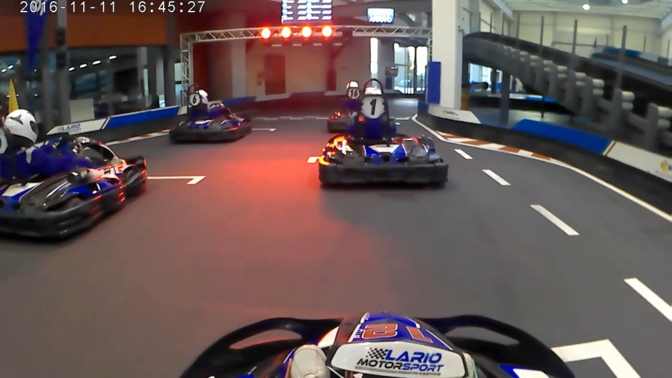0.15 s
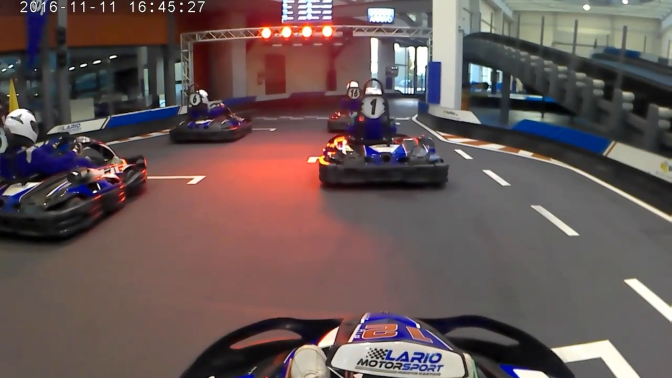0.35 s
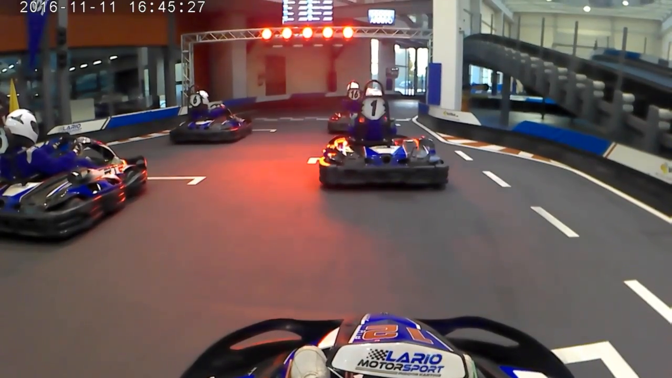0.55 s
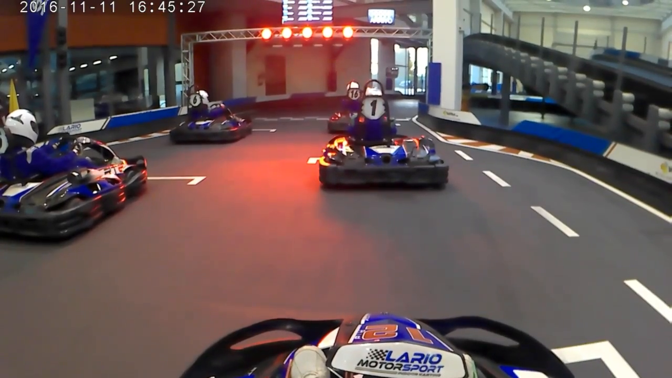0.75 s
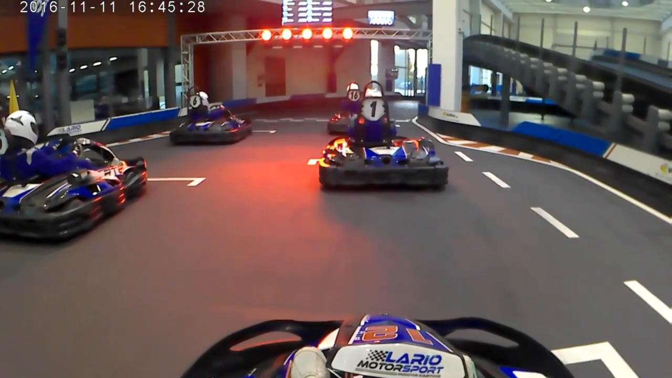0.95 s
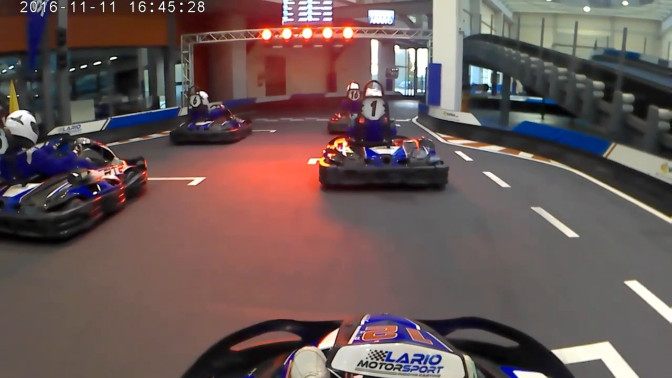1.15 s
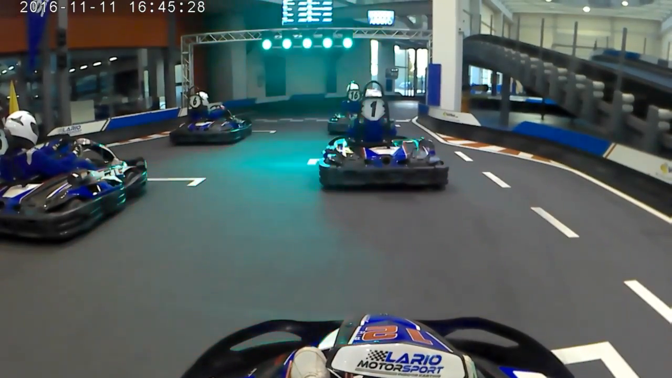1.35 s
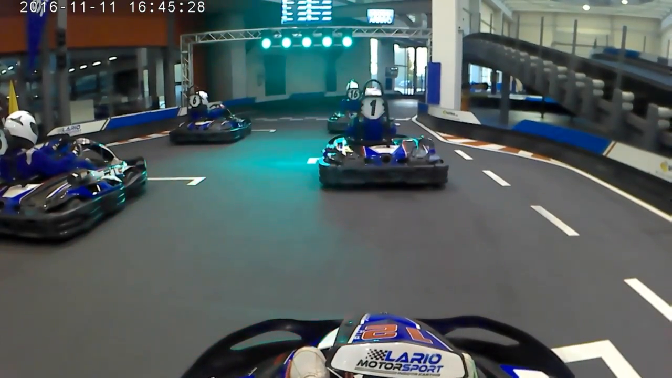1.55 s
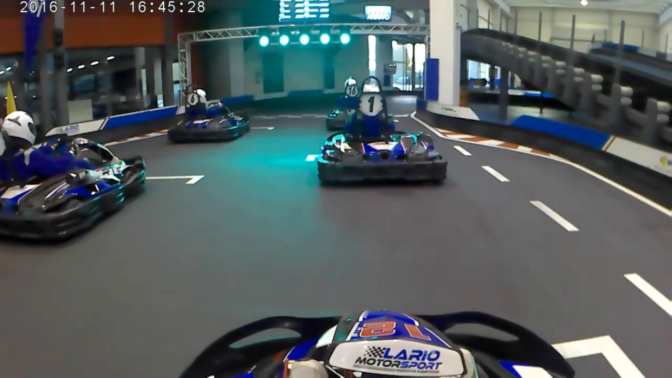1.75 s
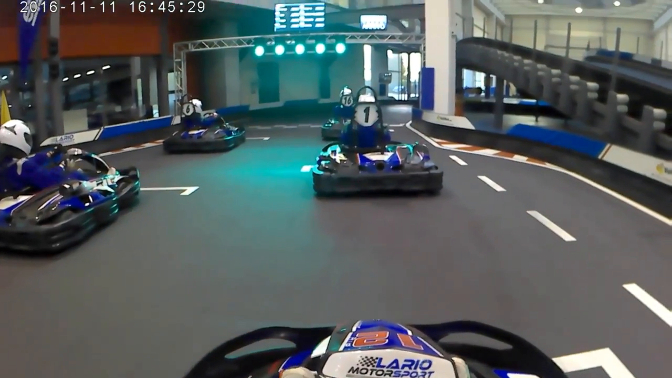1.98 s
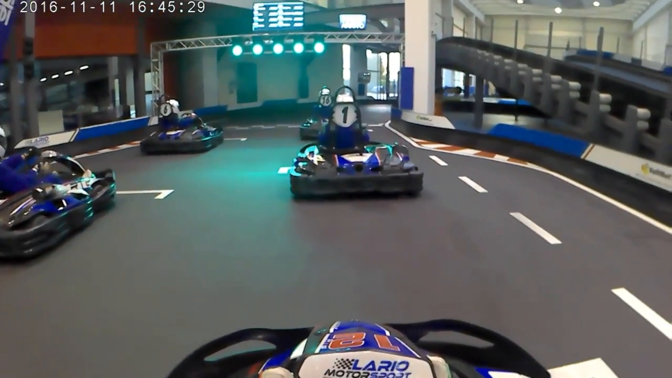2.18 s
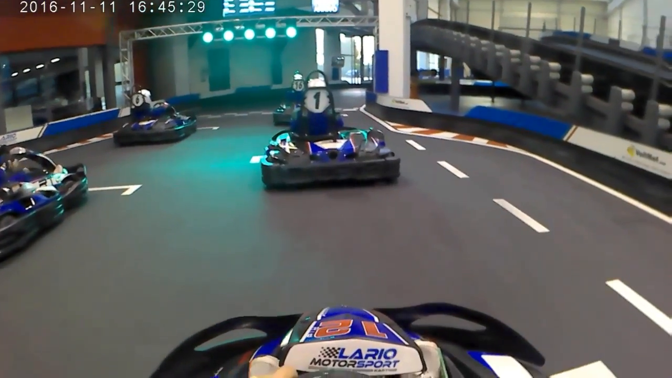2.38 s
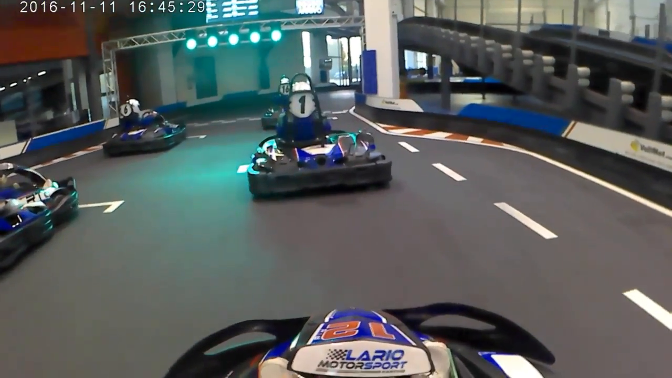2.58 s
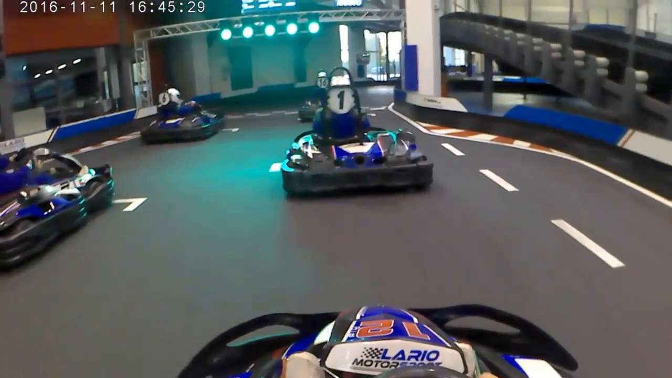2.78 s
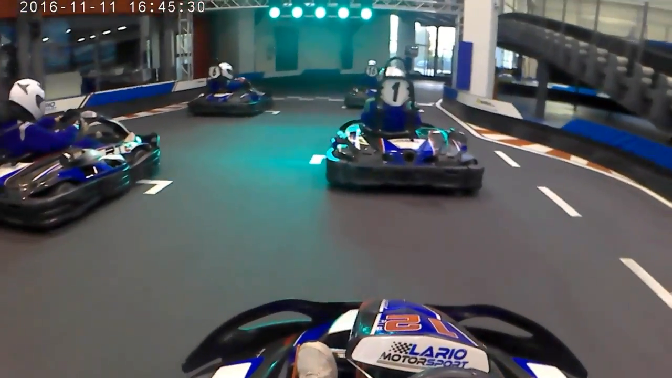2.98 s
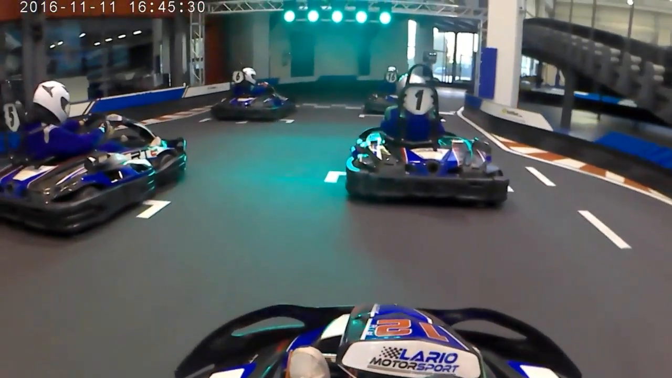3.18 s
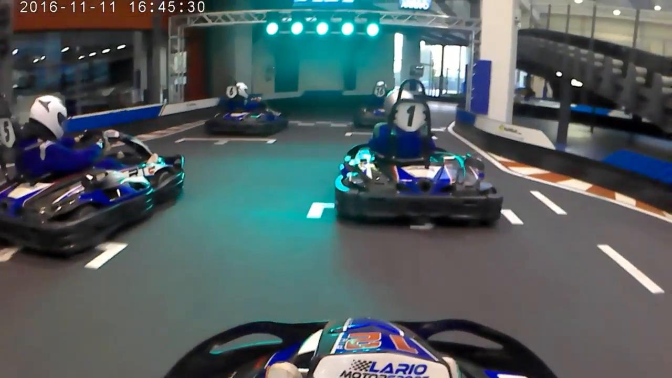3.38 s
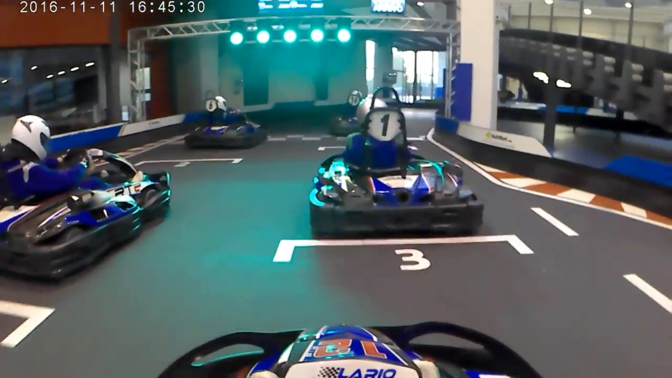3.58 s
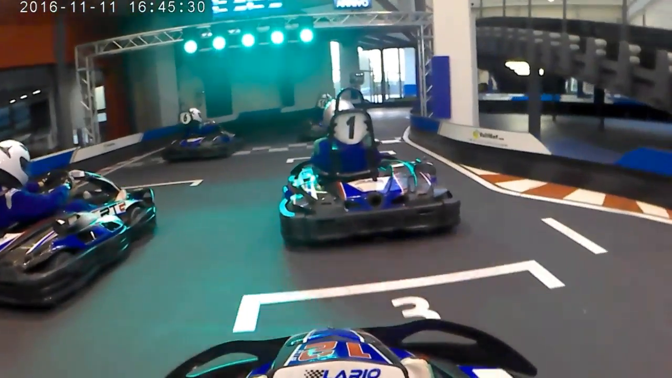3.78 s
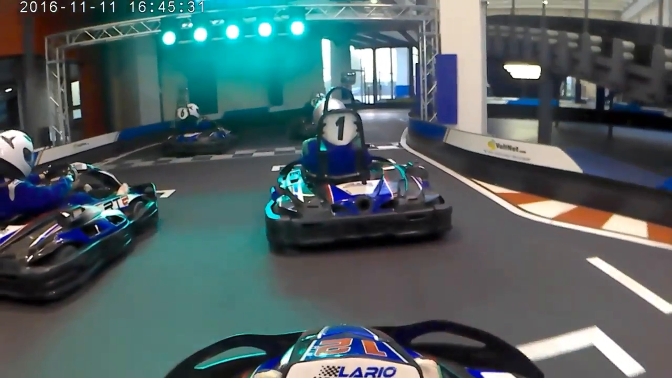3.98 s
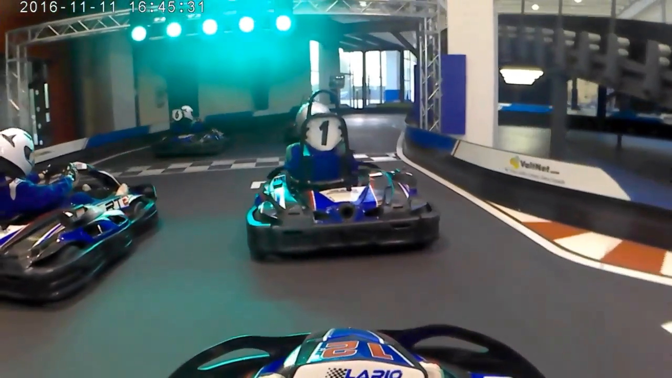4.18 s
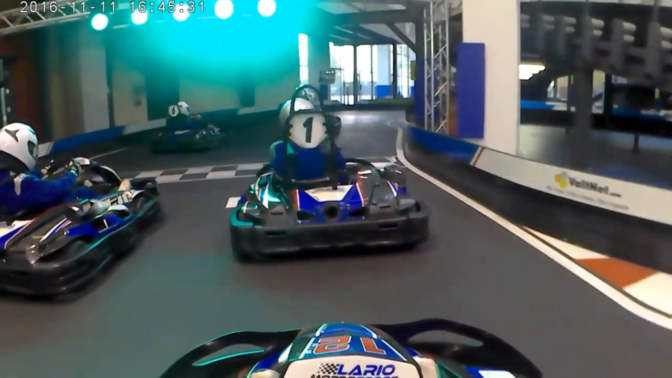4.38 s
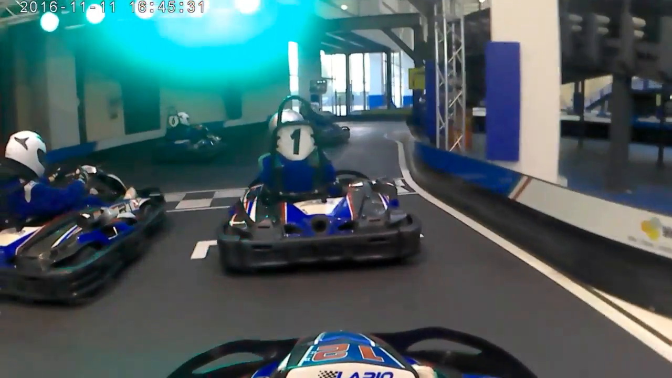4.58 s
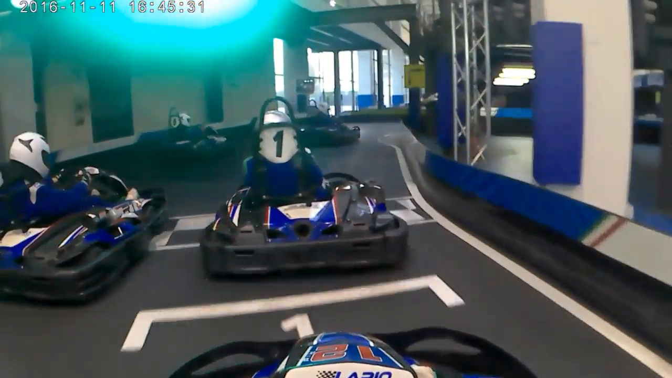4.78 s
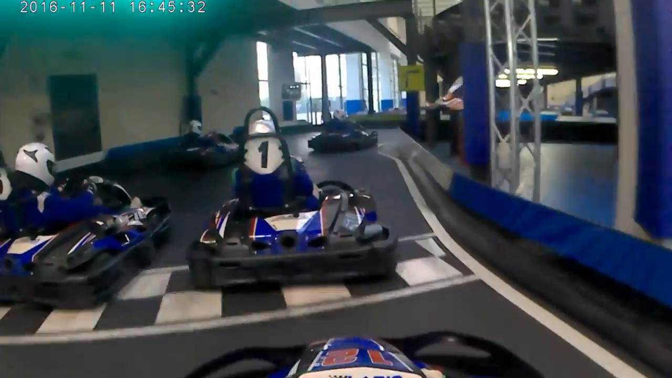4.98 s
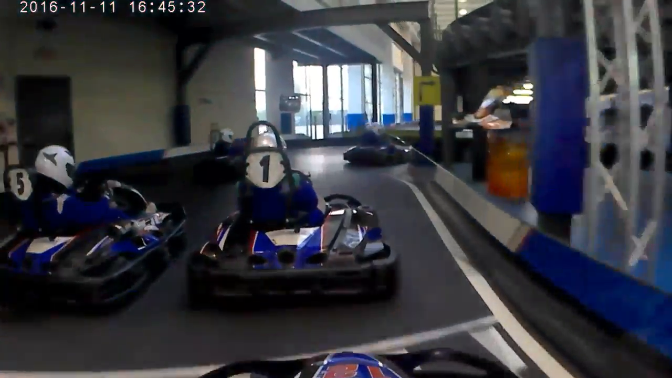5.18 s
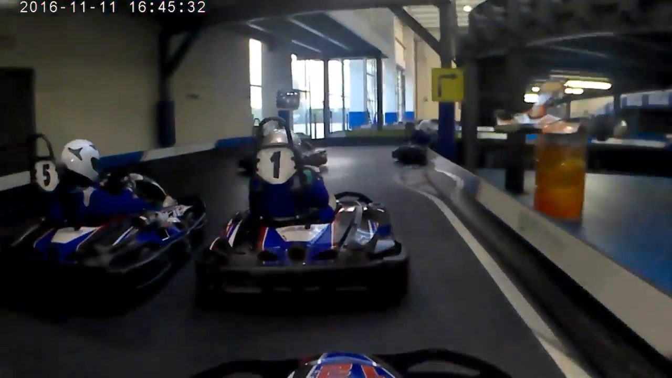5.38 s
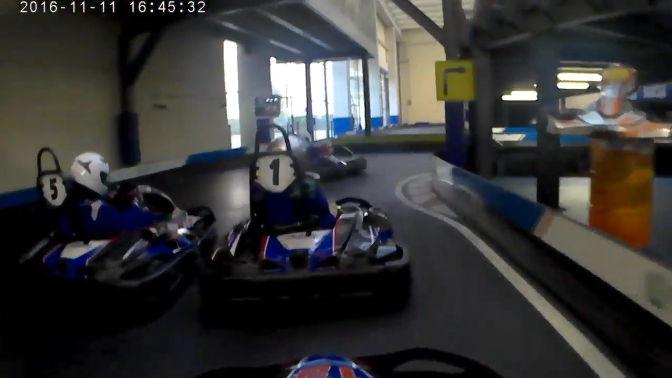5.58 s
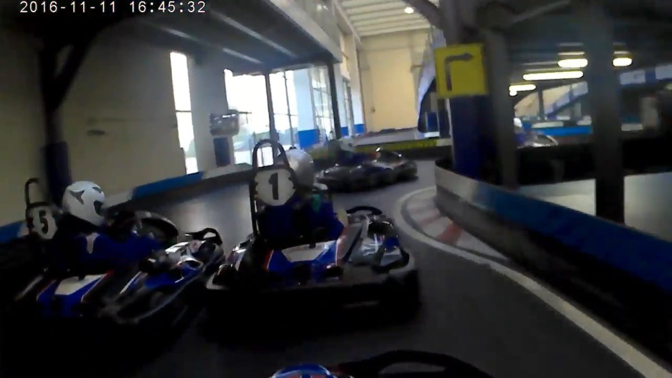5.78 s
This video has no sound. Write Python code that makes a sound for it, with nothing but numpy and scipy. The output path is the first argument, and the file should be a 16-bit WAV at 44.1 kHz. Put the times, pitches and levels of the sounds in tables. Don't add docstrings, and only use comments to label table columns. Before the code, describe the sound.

From 0 to about 2.4 s a small four-stroke kart engine idles quietly, a low even putter near 27 turns per second with hollow tube drumming and a soft, muffled wash from the field of karts in an indoor hall. The idle hunts slightly, with small surges around 1.7 and 1.9 s. At 2.45-2.6 s come sharp exhaust bursts and the clutch bites; pitch climbs rapidly to about 51 by 3.2 s, dips near 3.5 s, then holds around 49-51. The roar swells steadily until about 5 s and stays loud to the abrupt end at 5.8 s. While rolling, short dull clutch snatches rattle the frame irregularly, strongest from 3.9 s, over deep thumps and helmet jolts. A faint tooth whine comes and goes, clearest around 4.75-5.1 s and rising. The helmet camera microphone sounds boxy, rough and lo-fi, with grainy mirrored treble.

```python
import sys
import numpy as np
from scipy import signal
from scipy.fft import rfft, irfft
from scipy.io import wavfile
from scipy.ndimage import uniform_filter1d

SR = 44100
rng = np.random.default_rng(int(sys.argv[2]) if len(sys.argv) > 2 else 0)


def voltage_ratio(level):
    return 10 ** (np.asarray(level, float) / 20)


def store_wav(level_fs):
    pcm = np.round(np.clip(np.atleast_2d(level_fs), -1, 1) * 32767)
    wavfile.write(sys.argv[1], SR, pcm.T.astype(np.int16))


N = 257544
T = np.arange(N) / SR


def column(rows, count):
    rows = np.array(rows)
    return np.interp(T, rows[:, 0], rows[:, count])


def amp_curve(rows, count):
    return voltage_ratio(column(rows, count))


def evened(x):
    return x / np.sqrt(np.mean(x ** 2) + 1e-20)


def band_rms(x, lo_hz, hi_hz):
    z, hz = rfft(x), np.fft.rfftfreq(len(x), 1 / SR)
    inside = (hz > lo_hz) & (hz < hi_hz)
    return np.sqrt(2 * np.sum(abs(z[inside]) ** 2)) / len(x)


def drift(rate_hz):
    b, a = signal.butter(2, rate_hz, fs=SR)
    return evened(signal.lfilter(b, a, rng.standard_normal(N + SR))[SR:])


def coloured(x, points):
    hz, level_db = np.transpose(points)
    f = np.fft.rfftfreq(N, 1 / SR)
    gain_db = np.interp(np.log(f + 1), np.log(hz + 1), level_db)
    return irfft(rfft(x) * voltage_ratio(gain_db), N)


def resonate(x, hz, width_hz):
    carrier = np.exp(2j * np.pi * hz * T)
    r = np.exp(-np.pi * width_hz / SR)
    smooth = signal.lfilter([(1 - r) ** 2], [1, -2 * r, r * r], x / carrier)
    return 2 * (carrier * smooth).real


# start_s, level_db
ROAR_LEVEL = [(0.0, -41.5), (2.42, -41), (2.5, -37), (2.6, -35), (2.9, -31.5), (3.05, -29), (3.3, -28.5),
              (3.6, -28), (4.1, -27), (5.0, -25.5), (5.47, -26.5), (5.55, -24.5), (5.65, -25),
              (5.84, -24.5)]


def throttle():
    return np.clip((column(ROAR_LEVEL, count=1) + 40) / 9, 0, 1)


def follows(idle_db, pull_db, wander_db, wander_hz):
    offset_db = idle_db + (pull_db - idle_db) * throttle() + wander_db * drift(wander_hz)
    return amp_curve(ROAR_LEVEL, count=1) * voltage_ratio(offset_db)


def lobe(peak_s, level_db, length_s):
    return voltage_ratio(level_db) * np.exp(-.5 * ((T - peak_s) / length_s) ** 2)


def swells(idle_db, pull_db, rows):
    steady = voltage_ratio(idle_db + (pull_db - idle_db) * throttle())
    return np.sqrt(steady ** 2 + sum(lobe(*row) ** 2 for row in rows))


def firing_gate(turns, depth_db, at):
    return voltage_ratio(depth_db * np.cos(2 * np.pi * (turns / 2 - at)))


# start_s, speed_hz
CRANK_SPEED = [(0.0, 27.0), (0.4, 27.3), (1.3, 27.3), (1.8, 27.8), (2.2, 27.2), (2.5, 27.7), (2.58, 30.5),
               (2.74, 40.2), (3.0, 46.2), (3.24, 51), (3.44, 47.3), (3.6, 46.5), (3.85, 49.8), (4.28, 51),
               (4.46, 49), (5.0, 49), (5.4, 49.5), (5.84, 48.8)]


def crank_turns():
    return np.cumsum(column(CRANK_SPEED, count=1)) / SR - .056


# peak_s, level_db, length_s
HUNTING = [
    (0.4, -32.5, 0.34),
    (1.65, -30, 0.11),
    (1.94, -27.5, 0.18),
    (2.406, -31.5, 0.096),
    (2.598, -17.5, 0.03),
    (2.807, -22, 0.049),
]
# peak_s, level_db, length_s
CLUTCH_GRABS = [(2.666, -15, 0.02), (2.736, -17.5, 0.021), (2.918, -19, 0.076), (3.158, -21.5, 0.053),
                (3.282, -22.1, 0.033), (3.46, -15, 0.057), (3.588, -17, 0.034), (3.743, -21, 0.051),
                (3.912, -11, 0.056), (4.06, -14, 0.041), (4.207, -18.5, 0.077), (4.426, -19.5, 0.058),
                (4.624, -23, 0.033), (4.727, -25, 0.04), (4.997, -20, 0.038), (5.065, -30, 0.024),
                (5.156, -16, 0.017), (5.284, -17.5, 0.037), (5.431, -27, 0.041), (5.53, -26, 0.052),
                (5.632, -20, 0.064), (5.827, -15.5, 0.018)]
# peak_s, level_db, length_s
BURN_KICKS = [(2.934, -29, 0.042), (3.153, -41, 0.081), (3.475, -25.6, 0.063), (3.755, -22.5, 0.034),
              (3.905, -20, 0.074), (4.187, -27, 0.058), (4.368, -29, 0.101), (4.69, -31, 0.045),
              (4.846, -19, 0.043), (5.01, -18, 0.051), (5.153, -21, 0.034), (5.29, -21.5, 0.059),
              (5.44, -35, 0.038), (5.6, -19, 0.025), (5.788, -22.5, 0.064)]
# order_ratio, idle_db, load_db
CRANK_ORDERS = [(1.5, -10, -21), (2, -1.5, -18), (3, -9.5, -12), (4, -9.5, -8), (4.5, -7, -29),
                (6, -16.5, -28), (7, -28, -12), (8, -3.5, -29)]


def engine_shake(turns, drumming):
    unbalance = swells(-33.5, -31, HUNTING + CLUTCH_GRABS)
    out = voltage_ratio(3.0) * unbalance * np.cos(2 * np.pi * turns)
    kick = swells(-50, -36, BURN_KICKS)
    out += voltage_ratio(0.5) * kick * np.sin(np.pi * turns + 2.5 * drift(3.8))
    load = throttle()
    blur_rad = 0.14 + 1.62 * load
    for order, idle_db, pull_db in CRANK_ORDERS:
        waver = voltage_ratio(idle_db + (pull_db - idle_db) * load + 2.9 * drift(1.06))
        out += drumming * waver * np.cos(2 * np.pi * order * turns + blur_rad * drift(3.05))
    return out


def frame_drumming():
    steady = follows(idle_db=0, pull_db=-1.8, wander_db=0.5, wander_hz=5)
    return steady + voltage_ratio(-17.5) * swells(-58, -55, CLUTCH_GRABS)


# mode_hz, width_hz, level_db
FRAME_IDLE = [(164, 13, -0.5), (202.4, 33, 3), (220.2, 32, -5.5)]
# mode_hz, width_hz, level_db
FRAME_PULL = [(156.9, 13.4, -1), (184.3, 28, 2), (222.4, 15.3, -4)]


def ring_modes(knocks, modes):
    return evened(sum(voltage_ratio(level_db) * evened(resonate(knocks, hz, width_hz))
                      for hz, width_hz, level_db in modes))


def frame(turns, drumming):
    knocks = rng.standard_normal(N) * firing_gate(turns, depth_db=1.8, at=0.69)
    idle = ring_modes(knocks, FRAME_IDLE)
    pull = ring_modes(knocks, FRAME_PULL)
    rolling = np.clip((T - 2.9) / 0.39, 0, 1)
    return voltage_ratio(-1.5) * drumming * (np.sqrt(1 - rolling) * idle + np.sqrt(rolling) * pull)


# peak_s, level_db, length_s,
# pitch_hz
CLUTCH_SNATCHES = [
    (2.23, -37.5, 0.024, 196),
    (2.51, -32, 0.028, 202.4),
    (2.59, -36, 0.022, 187),
    (2.72, -37, .03, 220),
    (2.8, -30, 0.047, 188),
    (2.9, -33, .03, 210),
    (3.15, -31, .04, 215),
                   (3.017, -26.5, 0.021, 213), (3.059, -23, 0.014, 207), (3.395, -20.5, 0.021, 179),
                  (3.767, -22, 0.013, 172), (3.807, -23.3, 0.028, 164.1), (3.964, -16, 0.016, 180),
                  (4.049, -28, 0.02, 181), (4.116, -24, 0.016, 168), (4.22, -22, 0.016, 214),
                  (4.328, -18.5, 0.014, 183), (4.458, -22.5, 0.018, 194), (4.572, -32, 0.015, 171),
                  (4.693, -24, 0.03, 183.4), (4.813, -18, 0.01, 160), (4.877, -22, 0.016, 178),
                  (4.964, -26, 0.022, 194), (5.016, -20.7, 0.012, 179), (5.069, -24, 0.017, 174),
                  (5.13, -33, 0.012, 190.1), (5.185, -22, 0.013, 191), (5.262, -22.6, 0.016, 177.0),
                  (5.34, -17, 0.012, 180), (5.387, -26, 0.018, 186), (5.468, -16.5, 0.02, 187.3),
                  (5.534, -18, 0.01, 183), (5.624, -24, 0.059, 181.3), (5.75, -22.5, 0.026, 163),
                  (5.833, -21, 0.0089, 181.3)]


def chatter():
    out = np.zeros(N)
    for peak_s, level_db, length_s, hz in CLUTCH_SNATCHES:
        ring = np.cos(2 * np.pi * hz * (T - peak_s))
        out += np.sqrt(2) * lobe(peak_s, level_db, length_s) * ring
    return out


# freq_hz, density_db_per_hz
ROAR_IDLE = [(140, -49), (240, -19), (255, -17), (297, -2.5), (330, -9.5), (393, -5.5), (475, -12),
             (566, -8), (684, -11), (1170, -1.5), (1610, -10.5), (1710, -10.5), (1970, -4.5), (2870, -25),
             (3990, -34), (5190, -57), (8780, -120)]
# freq_hz, density_db_per_hz
ROAR_PULL = [(140, -68), (240, -2.5), (315, -3.5), (358, 1.5), (432, -3.5), (566, -3), (717, -8),
             (961, -3.5), (1120, 3.5), (1730, -10.5), (2040, -4), (2380, -17), (3150, -19.5), (3630, -25.5),
             (3990, -35), (5190, -57), (8780, -120)]
# freq_hz, gain_db
CASE_TREBLE = [(2150, 0.5), (2350, -3.5), (2650, 1.5), (2850, -3.5), (3300, 0), (3640, -5), (3800, 7.5),
               (4000, 8.5)]
# peak_s, burst_db, length_s
FIRST_FIRINGS = [
    (2.458, 5.5, 0.0057),
    (2.516, 1.5, 0.01),
    (2.546, -4.5, 0.015),
    (2.577, 5.5, 0.008),
]


def roar(turns):
    out, load = np.zeros(N), throttle()
    filter_taps = signal.firwin(401, [1600, 2500], fs=SR, pass_zero=True)
    for points, share, wash_db, puff_db in ((ROAR_IDLE, 1 - load, .6, 2.6), (ROAR_PULL, load, .4, .8)):
        noise = coloured(coloured(rng.standard_normal(N), points), CASE_TREBLE)
        wash = signal.oaconvolve(noise, filter_taps, "same")
        puffs = (noise - wash) * firing_gate(turns, puff_db, at=.72)
        wash = wash * firing_gate(turns, wash_db, at=0.48) * voltage_ratio(0.5 * drift(33))
        both = wash + puffs
        out += np.sqrt(share) * both / band_rms(both, 540, 2800)
    bursts_db = sum(burst_db * np.exp(-((T - peak_s) / length_s) ** 2)
                    for peak_s, burst_db, length_s in FIRST_FIRINGS)
    return amp_curve(ROAR_LEVEL, count=1) * voltage_ratio(bursts_db) * out


# start_s, pitch_hz, level_db
CHAIN_WHINE = [(3.25, 361, -41), (3.5, 357, -37), (3.7, 366, -55), (4.2, 365, -43), (4.5, 368, -54),
               (4.75, 375, -34), (4.95, 395, -36), (5.08, 410, -34), (5.2, 420, -48)]


def whine(blur_rad):
    rows = CHAIN_WHINE
    cycles = np.cumsum(column(rows, count=1)) / SR
    inside_s = np.minimum(T - rows[0][0], rows[-1][0] + .1 - T)
    fade = np.clip(inside_s / 0.12, 0, 1)
    tone = np.cos(2 * np.pi * cycles + blur_rad * drift(4.4))
    return np.sqrt(2) * fade * amp_curve(rows, count=2) * tone


# peak_s, level_db, length_s
HELMET_JOLTS = [(2.38, -38, 0.056), (2.896, -30.5, 0.061), (3.298, -25, 0.056), (3.43, -25, 0.064),
                (3.623, -29.5, 0.061), (3.763, -23, 0.044), (3.912, -26, 0.048), (4.108, -27, 0.066),
                (4.337, -29, 0.06), (4.484, -28.1, 0.043), (4.745, -28, 0.065), (4.952, -27.5, 0.048),
                (5.133, -24.5, 0.056), (5.288, -31, 0.029), (5.425, -28, 0.031), (5.584, -27.5, 0.06)]


def jolt_level():
    return swells(-45, -30.5, HELMET_JOLTS)


def seat():
    thuds = resonate(rng.standard_normal(N), hz=82, width_hz=105)
    steady = follows(idle_db=3.5, pull_db=-2, wander_db=1, wander_hz=3)
    level = voltage_ratio(-9.5) * steady + voltage_ratio(-15.5) * jolt_level()
    return level * thuds / band_rms(thuds, 42, 190)


def sway():
    skirt = [(1, -14), (4, 5), (9, 4), (16, 2.5), (40, -4), (70, -24), (150, -44)]  # hz, level_db
    bumps = coloured(rng.standard_normal(N), skirt)
    return jolt_level() * bumps / band_rms(bumps, 3.8, 12.5)


def scene():
    turns = crank_turns()
    drumming = frame_drumming()
    mix = engine_shake(turns, drumming) + frame(turns, drumming)
    mix += voltage_ratio(-1.5) * chatter()
    mix += roar(turns) + voltage_ratio(-2.5) * whine(blur_rad=0.31)
    mix += seat() + sway()
    return mix[None]


CAMERA_HZ = 8000


def starved(samples, centre_hz, width_hz, share):
    hz, t, z = signal.stft(samples, CAMERA_HZ, nperseg=256, noverlap=128)
    luck = uniform_filter1d(rng.standard_normal((len(hz), len(t))), size=5, axis=0)
    luck = evened(uniform_filter1d(luck, size=4, axis=1))
    wander = evened(uniform_filter1d(rng.standard_normal(len(t)), size=9))
    weak = np.exp(-((hz[:, None] - centre_hz - 45 * wander) / width_hz) ** 2)
    edge = np.exp(-((hz[:, None] - CAMERA_HZ / 2) / 60) ** 2)
    swell_s = 2.62
    share = share * (1 - .8 * np.exp(-((t - swell_s) / .2) ** 2))
    keep = luck < 3 - share * (weak + .5 * edge)
    return signal.istft(z * keep, CAMERA_HZ, nperseg=256, noverlap=128)[1]


def roll_off(x):
    return signal.sosfilt(signal.butter(12, 16370, fs=SR, output="sos"), x)


def record(dry):
    samples = signal.resample_poly(dry, 80, 441, axis=1, window=("kaiser", 5))
    lifted = signal.lfilter([1.12, -.12], [1], samples)
    kept = starved(lifted, centre_hz=3600, width_hz=190, share=3.4)
    held = np.repeat(kept, 6, axis=1)
    out = signal.resample_poly(held, 147, 160, axis=1)[:, :N]
    out = np.pad(out, ((0, 0), (0, N - out.shape[1])))
    filter_taps = signal.firwin(1023, 15480, window=("kaiser", 10), fs=SR)
    out = signal.oaconvolve(out, filter_taps[None], "same")
    return roll_off(out)


dry = scene()
out = record(dry)
store_wav(out)
```